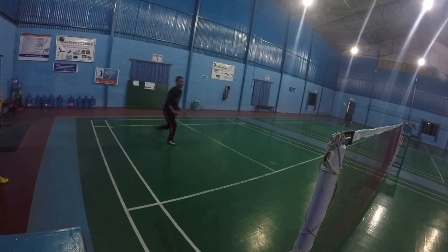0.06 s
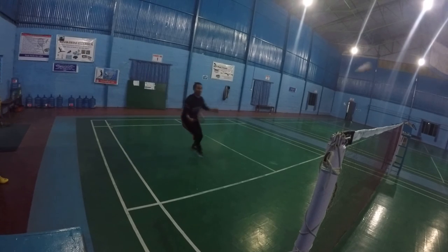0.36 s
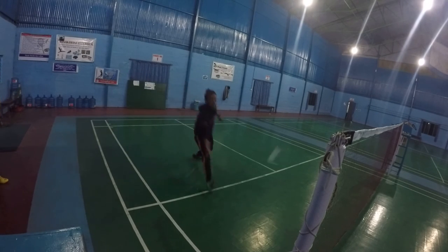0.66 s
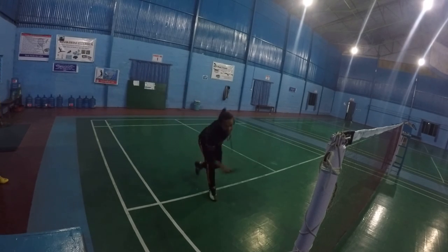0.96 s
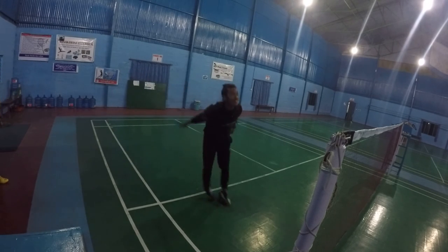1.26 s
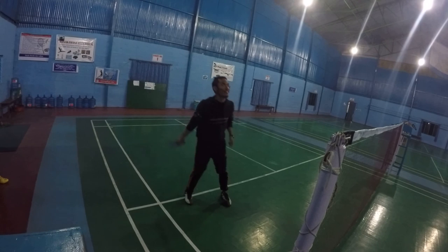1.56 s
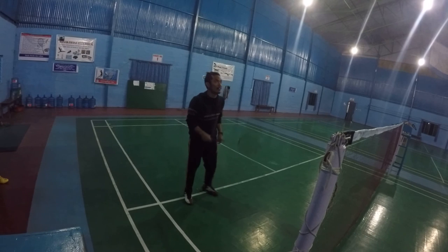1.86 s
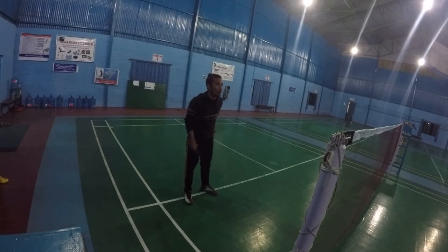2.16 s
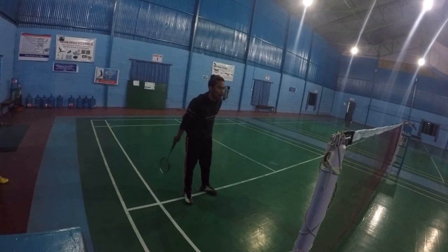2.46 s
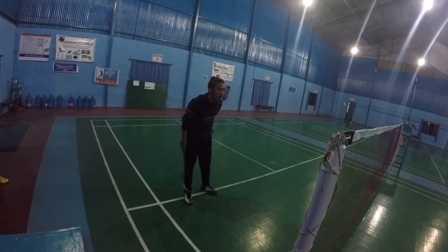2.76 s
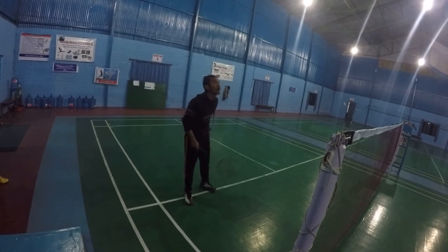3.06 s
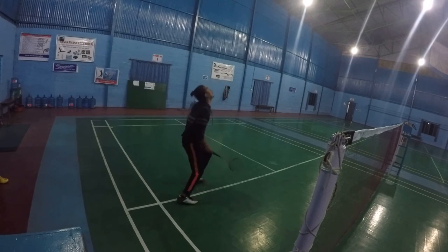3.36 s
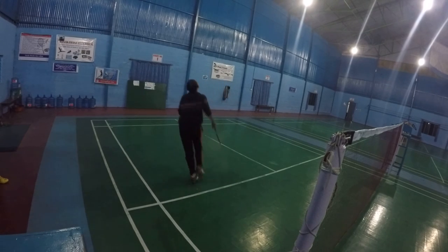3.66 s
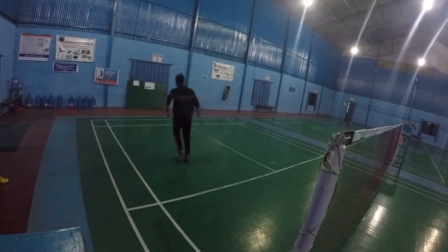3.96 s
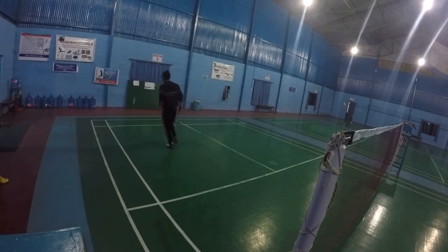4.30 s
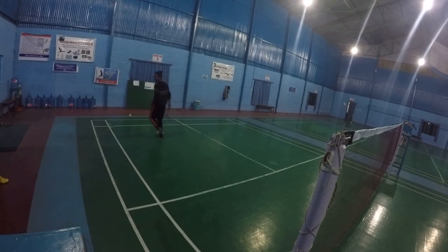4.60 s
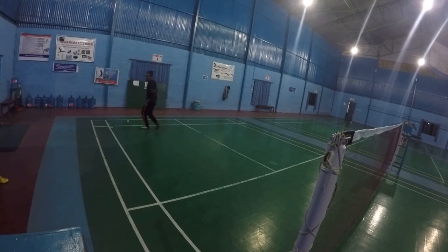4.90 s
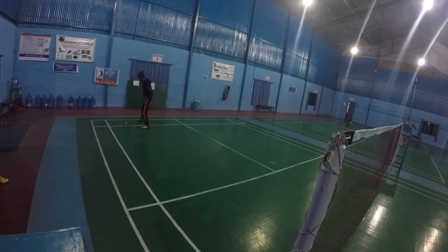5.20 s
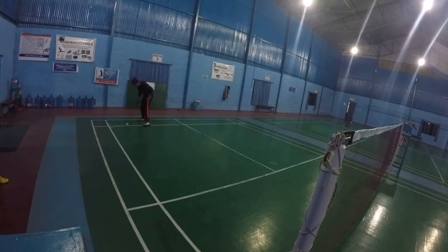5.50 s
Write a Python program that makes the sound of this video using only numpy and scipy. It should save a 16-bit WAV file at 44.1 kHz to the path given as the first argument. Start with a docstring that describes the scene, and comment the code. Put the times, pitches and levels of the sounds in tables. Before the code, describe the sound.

Footsteps thump on a court floor with brief shoe squeaks and two badminton racket cracks in a big, echoing hall.

```python
"""Running steps and squeaking rubber, a few metres from one microphone in a big, bare sports hall.
A badminton player lunges to a net shot, walks, serves and walks back to about ten metres off.
His steps send bending waves through the court floor; his soles slap, stick and slip, and the racket
cracks twice on the shuttlecock. Two hollow knocks come from further off, and the hall rings on for
seconds over a low rumble."""
import sys
import numpy as np
from scipy import signal
from scipy.fft import rfft, irfft
from scipy.io import wavfile
from scipy.ndimage import uniform_filter1d

SR = 44100
rng = np.random.default_rng(int(sys.argv[2]) if len(sys.argv) > 2 else 0)


def wrap_up_sound(samples):
    """Save the sound to the file named by the first command line argument, as 16-bit audio."""
    columns = np.atleast_2d(samples).T
    # keep every value between -1 and 1, then stretch to whole-number steps
    tamed = np.clip(columns, -1, 1)
    steps = np.round(tamed * 32767).astype(np.int16)
    wavfile.write(sys.argv[1], SR, steps)


N = 244314

# steps, with the roll until the weight lands and the relative strength of each part:
# touch_s, roll_s, thump_db, heave_db, knock_db, slap_db
STEPS = [(0.0, 0, -34, -45, -44, -74), (.213, .025, -19.5, -17, -38.5, -54),
         (.305, 0, -22, -17.5, -45, -63), (.58, 0, -32.5, -39, -34.5, -74), (.683, 0, -13, -14, -20.5, -45),
         (.7324, .003, -5.5, -11, -21.5, -44.5), (.808, 0, -17, -15, -35, -70),
         (.882, .047, -27.5, -22, -36, -54.5), (1.314, 0, -22, -25.5, -38, -61),
         (1.44, 0, -29, -28.5, -32.5, -74), (1.622, .013, -22.5, -34, -33, -53),
         (1.83, 0, -30, -43, -33.5, -60), (2.025, .028, -15.5, -14, -42.5, -62),
         (2.115, 0, -22, -25, -55, -75), (2.245, .035, -26, -28, -41, -59),
         (2.76, 0, -19.5, -24, -40.5, -66), (3.128, .005, -28, -39, -31.5, -67),
         (3.268, 0, -31.5, -30, -38, -70), (3.348, 0, -30, -30, -30, -53),
         (3.478, .051, -24.5, -32, -29.5, -55), (3.839, 0, -27.5, -47, -44, -66),
         (4.17, .005, -28.5, -27, -36.5, -74), (4.368, .008, -33, -23.5, -42, -64),
         (4.425, 0, -32, -35, -45, -74), (4.794, 0, -11.5, -22.5, -35.5, -70),
         (4.915, 0, -34.5, -26, -48, -64), (5.295, .005, -28.5, -29, -40, -65)]
# the player's distance from the microphone: time_s, distance_m
PLAYER_DISTANCE = [(0, 4.6), (.7, 3.8), (3.4, 3.4), (4.45, 6.73), (5.5, 10.6)]
# upper floor modes under a heel: pitch_hz, level_db
HEEL_MODES = [(135, 0), (171, 1.5), (222, 0), (270, -14)]
# long, low ring of floor and hall: pitch_hz, level_db, t60_s
LOW_MODES = [(36, -10, 1.4), (51.4, 1.5, 1.7), (78.4, 1, 1.07), (96.8, -7.5, 1.2), (108.6, -4, 1.3),
             (117.5, -2.5, 1.3), (170, 0, 0.72), (222.4, 4, 0.95), (273, -1.5, .6)]
# a sole's soft pat: frequency_hz, level_db
PAT_SPECTRUM = [(150, -27), (300, -6.5), (430, -3), (550, 3), (720, -15), (1000, -15), (3000, -57)]
# its flat slap: frequency_hz, level_db
SLAP_SPECTRUM = [(250, -33.5), (700, -10.5), (950, -10.5), (1150, 1), (1350, -4), (1680, -2.5),
                 (1880, -8.5), (2400, -14), (3000, -24), (6000, -53)]
# its gritty edge: frequency_hz, level_db
GRIT_SPECTRUM = [(400, -28.5), (1400, -3.5), (2300, -7), (3200, 0.5), (4500, -10), (6000, -18),
                 (10000, -20.5), (15000, -35)]
# grit relative to the slap as he crosses the court: time_s, level_db
GRIT_BALANCE = [(.2, 1), (.7, -4), (.9, 3), (1.4, 1), (1.65, -12), (2.1, 0), (3.2, -18), (3.9, -6),
                (5.3, 1)]
# slips of rubber on the mat: start_s, length_s, pitch_hz, level_db
SLIPS = [(.221, .006, 4200, -34), (.230, .012, 4430, -25), (.242, .023, 4230, -28),
         (.265, .019, 4490, -30.5), (.754, .019, 4300, -36), (.764, .011, 5250, -49),
         (1.314, .0135, 4450, -30.5), (1.545, .028, 5960, -57), (3.831, .012, 4480, -48.5),
         (3.868, .014, 4560, -55.5), (4.48, .026, 4590, -39), (4.800, .036, 4280, -46.5),
         (4.843, .026, 4200, -46.5)]
# a sole letting go: start_s, level_db
CHIRPS = [(.281, -58), (.771, -56), (1.320, -60), (4.503, -59), (5.274, -66)]
# a sole dragged over the mat: start_s, length_s, level_db
SCUFFS = [(.752, .034, -54.5), (1.268, .034, -63.5), (1.318, .034, -62), (1.508, .04, -58.5)]
# its thin, bright rasp: frequency_hz, level_db
SCUFF_SPECTRUM = [(500, -12), (1300, 3), (2100, -6), (3100, 0), (6000, -9), (7200, -3), (8000, -9),
                  (8800, 0), (9600, -9), (10800, -1), (12000, -10), (13200, -3), (15000, -22)]
# racket on shuttlecock, the last two rows heard as one crack: start_s, level_db, fall_s, send_db
STROKES = [(0.8297, -36, .0058, -3.5), (2.757, -30, 0.0036, 5.5), (2.7598, -29, 0.0032, 0.5)]
# strings, frame and cork: frequency_hz, level_db
RACKET_SPECTRUM = [(200, -20.5), (560, -6), (880, -8), (1140, 2.5), (1330, -3), (1700, -5), (2200, -2.5),
                   (2560, -4.5), (3300, -2.5), (3800, -11), (4350, -6), (5800, -19), (7100, -14.5),
                   (8300, -25), (10000, -19), (14500, -31)]
# ping of the strings: pitch_hz, level_db, t60_s
STRING_MODES = [(1420, -3, .07), (2560, -2, .09), (4420, -3, .06)]
# hollow knocks across the hall: start_s, rise_s, fall_s, level_db
FAR_KNOCKS = [(4.444, .013, .008, -35.5), (4.937, .018, .015, -45.5)]
# their colour: frequency_hz, level_db
FAR_KNOCK_SPECTRUM = [(200, -24), (420, -9), (540, 3), (720, -14), (980, -8), (1160, 3.5), (1370, -3),
                      (1700, -1), (1950, -11), (2400, -13), (3000, -25), (6000, -53)]
# decay of the hall: frequency_hz, t60_s
HALL_DECAY = [(200, 0.1), (500, 2.5), (1300, 4), (3300, 4.5), (4500, 2), (6500, 1.9), (9200, 1.42),
              (15000, 0.2)]
# first reflections off floor and walls: lag_s, level_db
REFLECTIONS = [(.0032, -20), (.0098, -9.5), (0.055, -17), (.096, -29)]
# the rally so far, still hanging in the hall: frequency_hz, level_db
RALLY_SPECTRUM = [(300, -19), (550, 1), (800, -9), (1300, -9), (2400, -11.5), (3300, 7.5), (3900, -6),
                  (4600, 6), (5000, -4), (5350, 7.5), (5900, -21.5), (10000, -30)]
# rumble and hiss of the hall: frequency_hz, level_db
ROOM_TONE_SPECTRUM = [(20, 0.5), (50, -1.5), (100, 0), (150, -10.5), (225, -15.5), (310, -27.5), (550, -31),
                      (800, -36), (1300, -34), (3000, -32), (5500, -43.5), (10000, -49), (15000, -53)]


def footfalls(side_db=-10, sag_hz=29, sag_db=-11, heave_hz=50, heave_trim_db=-5, knock_trim_db=-6):
    """Each step thumps, heaves and knocks the court floor, whose low modes ring on."""
    out, t = np.zeros(N), seconds(.3)
    for touch, roll, thump_db, heave_db, knock_db, _ in STEPS:
        # a step with less heel in it is lower and swells more slowly
        softness_db = np.clip(thump_db - knock_db, 0, 30)
        hz, swell_s = 101 - .35 * softness_db, .038 + .0004 * softness_db
        thump = bending_wave(t, hz, swell_s)
        # neighbouring plate modes beat against the main one
        sides = bending_wave(t, hz * 1.267, swell_s * .89) + bending_wave(t, hz * .82, swell_s * 1.63)
        thump += undb(side_db) * sides
        knock = np.zeros(len(t))
        for mode_hz, db in HEEL_MODES:
            detuned_hz = mode_hz * (1 + .016 * rng.standard_normal())
            heel_swell_s = swell_s * .69 * rng.uniform(.5, 1.95)
            knock += undb(db) * bending_wave(t, detuned_hz, heel_swell_s, glide=.018)
        # the body's weight moves the lowest modes
        heave = bending_wave(t, heave_hz, swell_s * 1.23, glide=.028)
        heave += undb(sag_db) * bending_wave(t, sag_hz, swell_s * 1.23)
        step = undb(thump_db) * thump + undb(heave_db + heave_trim_db) * heave
        add(out, touch + roll, step + undb(knock_db + knock_trim_db) * knock)
    return out + floor_ring(out)


def bending_wave(t, hz, swell_s, glide=.05):
    """A wave packet in the floor swells, passes and sinks in pitch, since short waves travel faster."""
    age = t / swell_s
    cycles = np.cumsum(hz * (1 + glide * np.clip(1 - age, -1, 1))) / SR + rng.random()
    return age ** 2 * np.exp(1 - age ** 2) * np.sin(2 * np.pi * cycles)


def floor_ring(steps, coupling=6.325):
    """The steps drive the low modes of floor and hall, each a narrow cluster that dies slowly."""
    t, ring = seconds(2), 0
    for hz, db, t60 in LOW_MODES:
        b, a = signal.iirpeak(hz, Q=8, fs=SR)
        cluster = signal.lfilter(b, a, signal.lfilter(b, a, rng.standard_normal(N)))
        ring += undb(db - 60 * t / t60) * unit(cluster[-len(t):])
    return coupling * signal.fftconvolve(steps, ring)[:N] / SR


def soles(rise_s=.007, fall_s=.03, stamp_db=-30, halving_db=4.5, pat_db=-21):
    """A sole rolls onto the mat with a pat, a slap and some grit; a stamped heel shortens the contact."""
    out, t = np.zeros((2, N)), seconds(.2)
    for touch, _, _, _, knock_db, slap_db in STEPS:
        shorten = .5 ** (max(knock_db - stamp_db, 0) / halving_db)
        force = press(t, rise_s * shorten, fall_s * shorten)
        cushion = press(t, rise_s, fall_s * np.sqrt(shorten))  # heel foam gives more slowly
        grit_db = slap_db + np.interp(touch, *np.transpose(GRIT_BALANCE))
        sound = undb(knock_db + pat_db) * contact(cushion, PAT_SPECTRUM)
        sound += undb(slap_db) * contact(force, SLAP_SPECTRUM)
        sound += undb(grit_db) * contact(force, GRIT_SPECTRUM)
        add(out[0], touch, sound)
        add(out[1], touch, sound * hall_send(touch, unity_m=6.83))
    return out


def squeaks(regrip_s=.015, settle_s=.0033, sag=.025, rasp=.13, loud_db=-30):
    """Rubber sticks and slips: a rough whistle that settles in pitch as the sole grips."""
    out, last_end = np.zeros((2, N)), 0
    for start, length, pitch_hz, db in SLIPS:
        t = seconds(length)
        sharp = .125 * (start - last_end > regrip_s)  # only a fresh slip starts sharp
        jitter = .018 * .5 ** ((loud_db - db) / 22)  # gentle slips waver less
        # uneven grip shakes both pitch and strength
        uneven = uniform_filter1d(rng.standard_normal((2, 4096)), size=36)
        waver, grip = unit(uniform_filter1d(uneven, size=36))[:, :len(t)]
        bend = sharp * np.exp(-t / settle_s) + sag * (.5 - t / length)
        hz = pitch_hz * (1 + bend + jitter * (waver - waver.mean()))
        phase = 2 * np.pi * np.cumsum(hz) / SR
        octave_db = -58 + .6 * (db - loud_db)  # overtones grow more slowly: loud squeaks are purer
        partials_db = [db, octave_db, octave_db - 15]
        tone = sum(undb(level) * np.sin(k * phase) for k, level in enumerate(partials_db, 1))
        tone *= (1 + rasp * grip) * signal.windows.tukey(len(t), .5)
        add(out[0], start, tone)
        add(out[1], start, tone * hall_send(start, unity_m=5.3, power=1.45))
        last_end = start + length
    return out


def racket(rebound_s=.0093, rebound_db=-4, dull_hz=3200, strings_db=-11):
    """The cork cracks on the pinging strings, and the floor throws back a duller crack."""
    out, t = np.zeros((2, N)), seconds(.16)
    for start, db, fall_s, send_db in STROKES:
        crack = undb(db) * contact(np.exp(-t / fall_s), RACKET_SPECTRUM)
        rebound = undb(db + rebound_db) * contact(np.exp(-t / (2 * fall_s)), RACKET_SPECTRUM)
        ping = np.zeros(len(t))
        for hz, mode_db, t60 in STRING_MODES:
            detuned_hz = hz * (1 + .01 * rng.standard_normal())
            ping += undb(mode_db - 60 * t / t60) * np.sin(2 * np.pi * detuned_hz * t)
        add(out[0], start, crack + undb(db + strings_db) * ping)
        add(out[0], start + rebound_s, signal.lfilter(*signal.butter(2, dull_hz, fs=SR), rebound))
        add(out[1], start, crack * undb(send_db))
    return out


def scuffs(send_db=-5):
    """Rubber grazes the mat in a short rasp that swells and fades."""
    out, t = np.zeros(N), seconds(.1)
    for start, length, db in SCUFFS:
        force = np.sin(np.pi * np.minimum(t / length, 1))
        add(out, start, undb(db) * contact(force, SCUFF_SPECTRUM))
    return np.array([out, out * undb(send_db)])


def chirps(length_s=.009, from_hz=9100, to_hz=6900, send_db=-4):
    """The rubber snaps free with a faint falling chirp."""
    out, progress = np.zeros(N), seconds(length_s) / length_s
    hz = from_hz + (to_hz - from_hz) * progress
    chirp = np.sin(2 * np.pi * np.cumsum(hz) / SR) * np.sin(np.pi * progress)
    for start, db in CHIRPS:
        add(out, start, undb(db) * chirp)
    return np.array([out, out * undb(send_db)])


def far_knocks(send_db=-1.5):
    """Soft, hollow knocks reach the microphone from across the hall."""
    out, t = np.zeros(N), seconds(.2)
    for start, rise_s, fall_s, db in FAR_KNOCKS:
        add(out, start, undb(db) * contact(press(t, rise_s, fall_s), FAR_KNOCK_SPECTRUM))
    return np.array([out, out * undb(send_db)])


def hall(send, wet_gain=2.825, build_s=.013):
    """Floor and bare walls return a few reflections, then a dense tail whose top the air absorbs."""
    hz, t, cells = signal.stft(rng.standard_normal(3 * SR), SR, nperseg=512)
    decay = undb(-60 * t / at_hz(HALL_DECAY, hz)[:, None])
    tail = signal.istft(cells * decay, SR)[1]
    build = 1 - np.exp(-np.arange(len(tail)) / SR / build_s)
    tail *= build * wet_gain / np.sqrt(SR)
    for lag, db in REFLECTIONS:
        tail[int(lag * SR)] += undb(db)
    return signal.fftconvolve(send, tail)[:N]


def hall_send(start, unity_m, power=1):
    """The further the player is from the microphone, the more of his sound comes by way of the hall."""
    return (np.interp(start, *np.transpose(PLAYER_DISTANCE)) / unity_m) ** power


def room_tone(air_db=-44.5, rally_db=-54, rally_t60_s=1.33):
    """Steady low rumble and faint hiss, with the ring of the rally so far dying away."""
    air = unit(colour(rng.standard_normal(N), ROOM_TONE_SPECTRUM))
    rally = unit(colour(rng.standard_normal(N), RALLY_SPECTRUM))
    return undb(air_db) * air + undb(rally_db - 60 * np.arange(N) / SR / rally_t60_s) * rally


def contact(force, spectrum):
    """Many tiny impacts ring a body; their strength follows the force."""
    patter = force * rng.standard_normal(len(force))
    for _ in range(8):  # flatten the patter's spectrum, so that the body alone gives the colour
        flat = irfft(np.exp(1j * np.angle(rfft(patter))), len(force))
        local_rms = np.sqrt(np.abs(uniform_filter1d(flat ** 2, size=32)) + 1e-18)
        patter = force * flat / local_rms
    return unit(colour(patter, spectrum)) * np.sqrt(np.mean(force ** 2))


def press(t, rise_s, fall_s):
    """Force of a contact: a straight rise, then a decay."""
    return np.minimum(t / rise_s, 1) * np.exp(-np.maximum(t - rise_s, 0) / fall_s)


def colour(x, spectrum, size=4096):
    """Ring a body with the given spectrum: a causal, minimum-phase response."""
    hz = np.arange(size // 2 + 1) * SR / size
    cepstrum = irfft(np.log(undb(at_hz(spectrum, hz))))
    cepstrum[1:size // 2] *= 2
    cepstrum[size // 2 + 1:] = 0
    return signal.fftconvolve(x, irfft(np.exp(rfft(cepstrum))))[:len(x)]


def at_hz(points, hz):
    """Read (frequency_hz, value) points on a log-frequency axis."""
    point_hz, value = np.transpose(points)
    return np.interp(np.log(np.maximum(hz, 1)), np.log(point_hz), value)


def undb(db):
    """Decibels to gain."""
    return 10 ** (np.asarray(db) / 20)


def unit(x):
    """Scale to rms 1."""
    return x / np.sqrt(np.mean(x ** 2))


def seconds(length):
    """A time axis."""
    return np.arange(int(length * SR)) / SR


def add(track, start, sound):
    """Mix a sound into a track at a time in seconds."""
    i = max(int(start * SR), 0)
    track[i:i + len(sound)] += sound[:N - i]


def scene():
    """Floor thumps, airborne sounds (each a direct path and a hall send) and room tone, in mono."""
    direct, send = soles() + far_knocks() + racket() + squeaks() + chirps() + scuffs()
    return (footfalls() + direct + hall(send) + room_tone())[None]


def record(dry, top_hz=15300):
    """The microphone chain cuts the top of the treble steeply."""
    return signal.sosfilt(signal.ellip(10, .1, 80, top_hz, fs=SR, output="sos"), dry)


dry = scene()
out = record(dry)
wrap_up_sound(out)
```